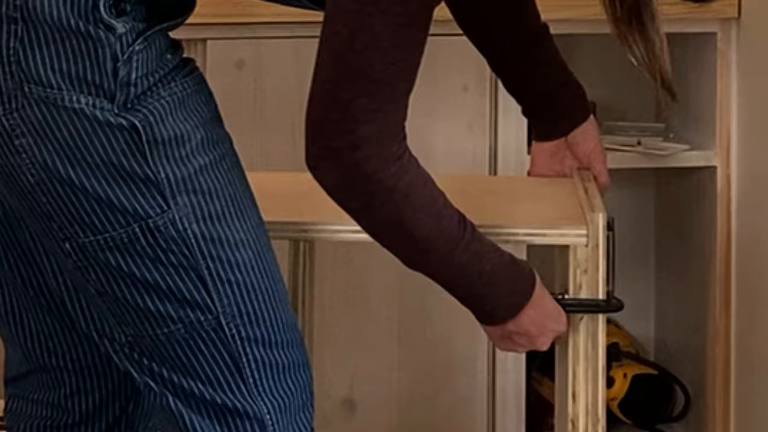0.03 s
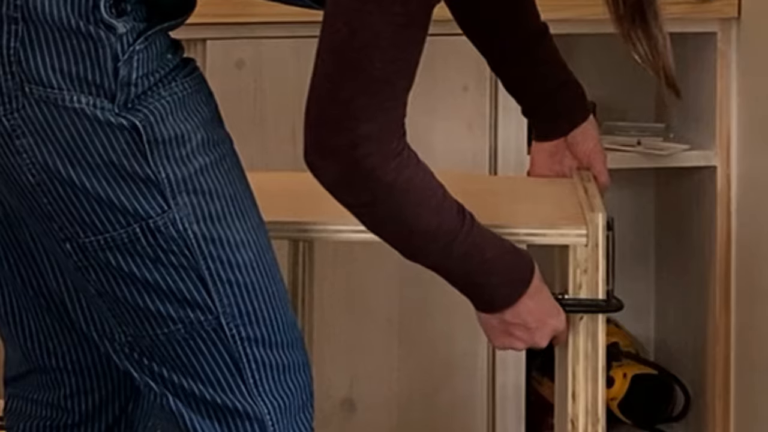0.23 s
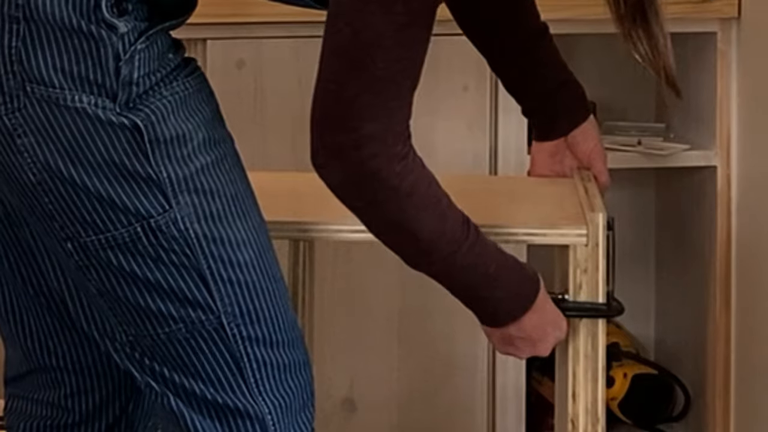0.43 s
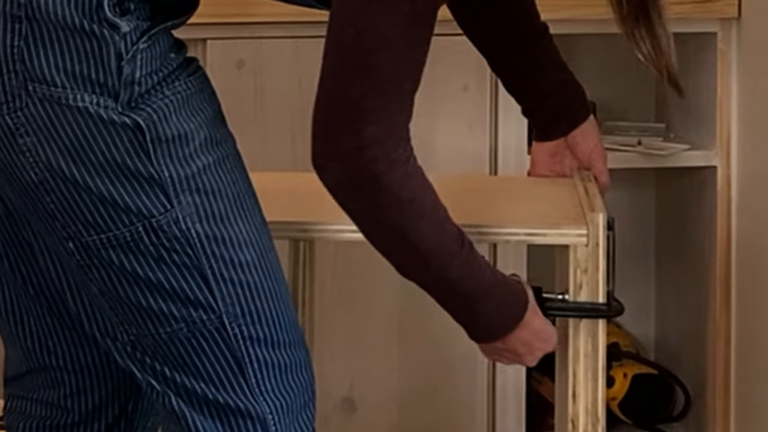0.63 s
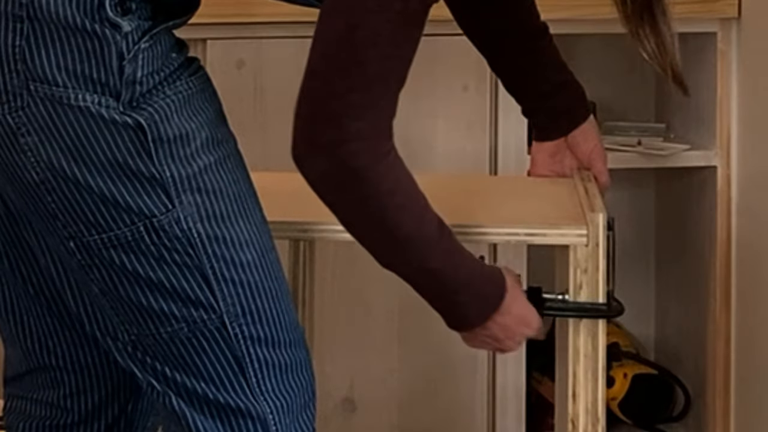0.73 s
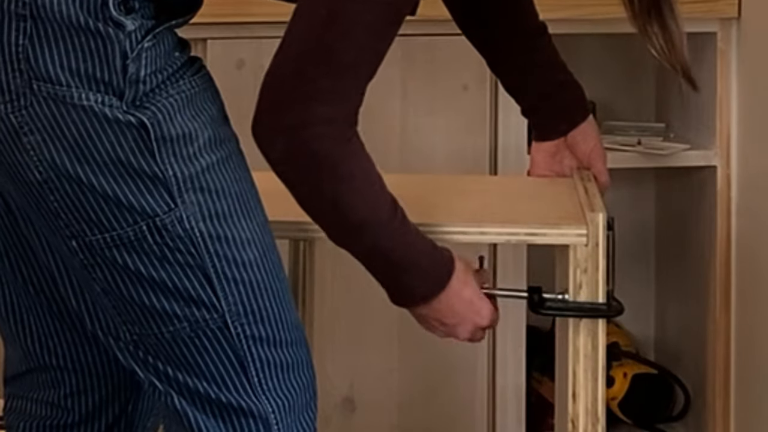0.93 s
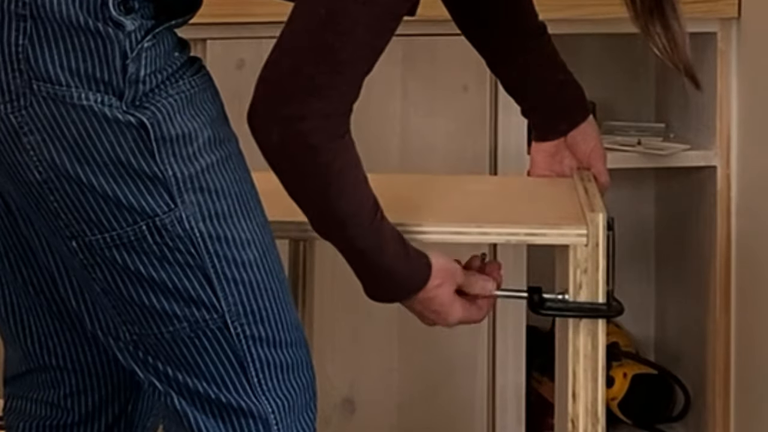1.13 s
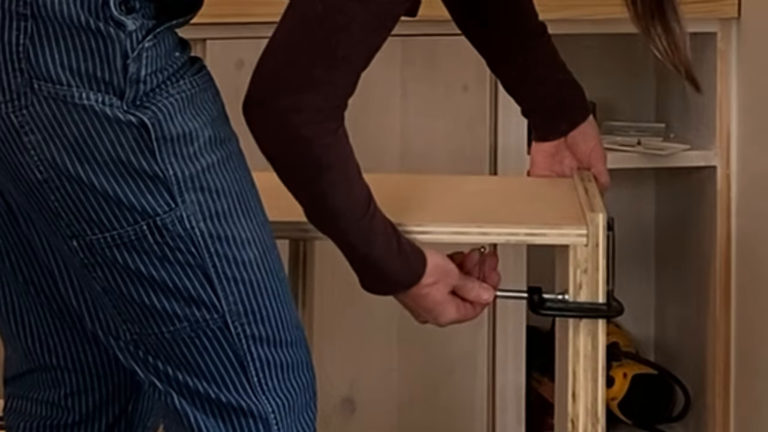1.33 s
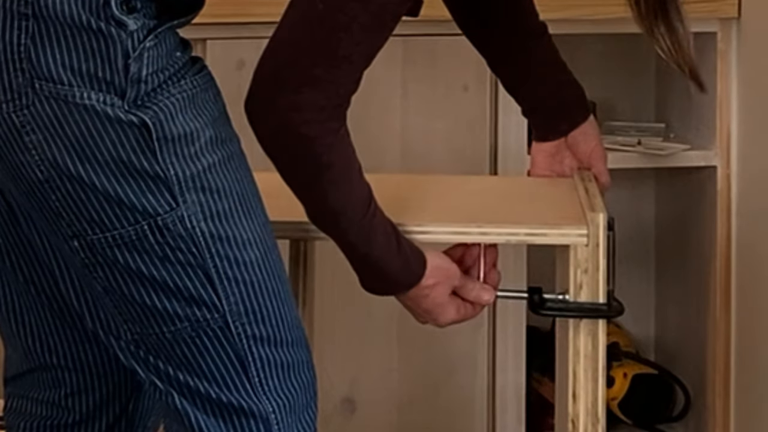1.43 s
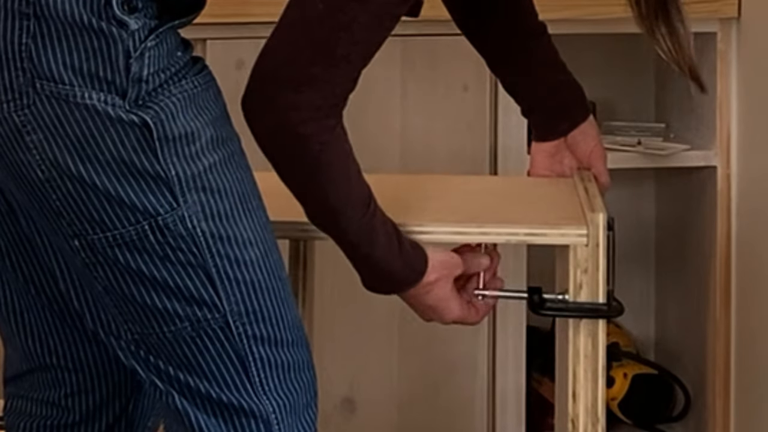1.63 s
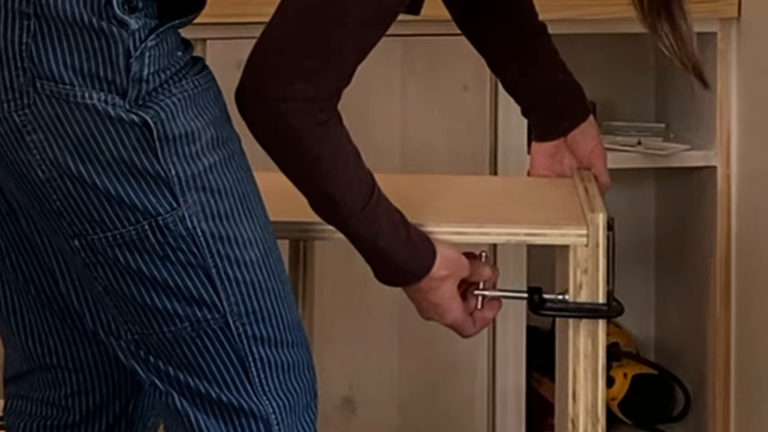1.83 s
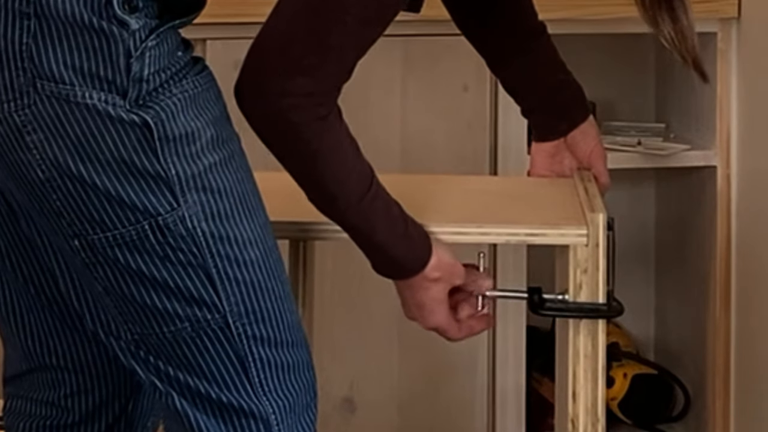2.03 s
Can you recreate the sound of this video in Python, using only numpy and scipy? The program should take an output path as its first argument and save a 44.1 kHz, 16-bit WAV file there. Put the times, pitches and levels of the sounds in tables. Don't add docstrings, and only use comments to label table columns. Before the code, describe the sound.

A small steel clamp is wound tight on a plywood board in a quiet workshop. Faint woody judders and light ticks come at 0 to 0.7 seconds; low air thumps buffet the close microphone around 0.9 to 1.3. A bright metallic clack rings at 1.12, with knocks following. Softer clicks at 1.6 and 1.7 lead to hollow knocks around 1.85 and a last tap at 2.06, over faint hiss.

```python
import sys
import numpy as np
from scipy import signal
from scipy.fft import rfft, irfft
from scipy.io import wavfile
from scipy.ndimage import uniform_filter1d

SR = 44100
rng = np.random.default_rng(int(sys.argv[2]) if len(sys.argv) > 2 else 0)


def file_out(sig):
    cols = np.atleast_2d(sig).T
    lim = np.clip(cols, -1, 1)
    pcm = np.round(lim * 32767).astype(np.int16)
    wavfile.write(sys.argv[1], SR, pcm)


def amplitude_ratio(level_db):
    exponent = np.asarray(level_db, float) / 20
    return 10 ** exponent


N = 91816


def evened(x):
    return x / np.sqrt(np.mean(x ** 2) + 1e-20)


def read(points, hz):
    f, value = np.transpose(points)
    return np.interp(np.log(hz + 1), np.log(f + 1), value)


def add(mix, start_s, sound):
    part = mix[max(round(start_s * SR), 0):][:len(sound)]
    part += sound[:len(part)]


def smoothed_twice(x, size):
    return uniform_filter1d(uniform_filter1d(x, size=size), size=size)


def coloured(size, spectrum):
    hz = np.fft.rfftfreq(size, 1 / SR)
    white = rfft(rng.standard_normal(size))
    return evened(irfft(white * amplitude_ratio(read(spectrum, hz)), size))


def floor():
    # f/Hz, level/dB per Hz
    room_hiss = [(25, -60),
                 (35, -41), (60, -12.5), (130, -10), (425, -20), (478, -19.5), (550, -23),
                     (1030, -28.5), (9910, -39.5), (15800, -41)]
    level_db, patch_db = -62, 0.2
    frames, hz = N // 256 + 5, np.fft.rfftfreq(1024, 1 / SR)
    a, b, patches = rng.standard_normal((frames, 513, 3)).T
    patches = uniform_filter1d(patches, size=14, axis=0)
    patches = evened(uniform_filter1d(patches, size=12, axis=1))
    spectrum_db = read(room_hiss, hz)[:, None]
    z = (a + 1j * b) * amplitude_ratio(spectrum_db + patch_db * patches)
    hiss = signal.istft(z, nperseg=1024, noverlap=768)[1][:N]
    return amplitude_ratio(level_db) * evened(hiss)


def air():
    # t/s, level/dB
    draught_course = [(0, -44.5), (.15, -48.5), (.28, -47), (.4, -39), (.48, -44), (.55, -44), (.7, -48.5),
                      (.84, -47), (1.3, -38), (1.4, -48.5), (1.58, -46), (1.63, -43.5), (1.8, -46),
                      (1.93, -46), (2.08, -42.5)]
    # f/Hz, level/dB per Hz
    draught_colour = [(3, -16), (15, 7), (36, 0.5), (50, -10.5), (90, -14.5), (130, -63.5), (400, -32),
                      (900, -140)]
    # t/s, level/dB, width/s, push or pull [+1/-1]
    buffets = [(0.371, -38, 0.0053, 1), (0.413, -39, 0.0034, -1), (0.481, -50, 0.0058, 1),
               (0.858, -34, 0.0043, 1), (0.873, -25.5, 0.0046, -1), (.882, -24, 0.0043, 1),
               (0.894, -23.5, 0.004, 1), (0.905, -24.5, 0.0082, -1), (0.927, -38, 0.0062, 1),
               (0.943, -26.5, 0.0021, 1), (0.974, -31.5, 0.0033, 1), (0.984, -21.5, 0.0044, -1),
               (1.013, -23.5, 0.014, -1), (1.028, -29, 0.0025, 1), (1.058, -19.5, 0.0022, -1),
               (1.07, -23.5, 0.0026, 1), (1.086, -29.5, 0.018, -1), (1.155, -28.5, 0.0026, 1),
               (1.177, -22.5, 0.005, -1), (1.191, -24.5, 0.002, 1), (1.224, -34.5, 0.0019, -1),
               (1.238, -33, 0.0025, 1), (1.258, -29, 0.00315, -1), (1.271, -39, 0.0077, 1),
               (1.31, -27.5, 0.0046, -1), (1.63, -35.5, 0.0069, -1), (1.675, -48, .006, 1)]
    t = np.arange(N) / SR
    course_s, course_db = np.transpose(draught_course)
    draught = coloured(N, draught_colour)
    draught = draught / np.sqrt(abs(smoothed_twice(draught ** 2, 1800)) + 0.012)
    lumps = np.zeros(N)
    for at_s, db, width_s, way in buffets:
        lumps += np.sign(way) * amplitude_ratio(db) * np.exp(-0.5 * ((t - at_s) / width_s) ** 2)
    lumps = lumps - smoothed_twice(lumps, 3000)
    return amplitude_ratio(np.interp(t, course_s, course_db)) * draught + lumps


def workshop(x):
    # f/Hz, t60/s
    decay = [(250, 0.17), (500, 0.42), (1000, 0.32), (4000, 0.17), (8000, 0.24), (14000, 0.25)]
    level_db, delay_s, low_hz = -6.5, 0.006, 900
    taps, at = np.zeros(SR // 2), np.arange(0, SR // 2 - 20, 20)
    taps[at + rng.integers(0, 20, len(at))] = rng.choice([-1., 1.], len(at))
    hz, t, z = signal.stft(taps, SR, nperseg=256)
    fade = amplitude_ratio(-60 * t / read(decay, hz)[:, None])
    bass_cut = np.minimum(hz / low_hz, 1)[:, None]
    tail = signal.istft(z * fade * bass_cut, SR, nperseg=256)[1]
    wet = np.zeros(N)
    add(wet, delay_s, signal.fftconvolve(x, tail / np.linalg.norm(tail)))
    return amplitude_ratio(level_db) * wet


def swell(length_s):
    peak_at = 0.71
    u = np.arange(SR // 8) / SR / length_s
    return np.clip(np.minimum(0.49 + u / peak_at, (1 - u) / (1 - peak_at)), 0, 1)


def contacts(length_s):
    contacts_per_s, spread_db = 7000, 3
    chance, size, sign = rng.random((SR // 8, 3)).T
    hits = (chance < contacts_per_s / SR) * np.sign(sign - 0.5)
    force = swell(length_s) * hits * amplitude_ratio(-spread_db * np.log(size + 0.02))
    return force / np.linalg.norm(force) * np.sqrt(length_s * SR)


def ring(modes, grain, grain_db):
    spot_db = 2
    t = np.arange(SR // 5) / SR
    spot = spot_db * rng.standard_normal(len(modes))
    clear = np.zeros(len(t))
    for (hz, db, t60_s), shift_db in zip(modes, spot):
        clear += amplitude_ratio(db + shift_db - 60 * t / t60_s) * np.sin(2 * np.pi * hz * t)
    hz = abs(np.fft.fftfreq(len(t), 1 / SR))
    log_gain = np.log(amplitude_ratio(np.maximum(read(grain, hz), -80)))
    click = np.fft.ifft(np.exp(np.conj(signal.hilbert(log_gain)))).real
    click = click * amplitude_ratio(-900 * t)
    return clear / np.linalg.norm(clear) + amplitude_ratio(grain_db) * click / np.linalg.norm(click)


def drum(start_s, length_s, hz, t60_s):
    detune = 0.006
    t = np.arange(SR // 4) / SR
    stored = signal.fftconvolve(swell(length_s), amplitude_ratio(-60 * t / t60_s))[:len(t)]
    wobble = evened(uniform_filter1d(rng.standard_normal(len(t)), size=300))
    turns = hz * (start_s + t * (1 + detune * rng.standard_normal()))
    level = stored / stored.max() * amplitude_ratio(2.2 * wobble)
    return level * np.sin(2 * np.pi * turns + 0.29 * wobble)


def judder(start_s, length_s, panel_db, shelf_db, board_db):
    # f/Hz, level/dB, t60/s
    board_modes = [(663, -3, 0.12), (744, -3, 0.066), (844, 9, 0.019), (1110, 4, 0.015), (1233, 3, 0.022),
                   (1304, -5, 0.041), (1370, -3, 0.028), (1392, 0, 0.017), (1870, -1.5, 0.049),
                   (2160, -9.5, 0.04), (1540, -0.5, 0.014)]
    # f/Hz, level/dB per Hz
    board_grain = [(230, -43.5), (300, 20.5), (600, 1.5), (1400, -7.5), (2300, 6.5), (3000, -56),
                   (6000, -48)]
    board = ring(board_modes, board_grain, grain_db=-5.5)
    out = amplitude_ratio(board_db) * signal.fftconvolve(contacts(length_s), board)
    panel = amplitude_ratio(panel_db) * drum(start_s, length_s, hz=335, t60_s=0.03)
    shelf = amplitude_ratio(shelf_db) * drum(start_s, length_s, hz=482, t60_s=0.019)
    add(out, 0, panel + shelf)
    return start_s, out


def rattle(start_s, length_s, frame_db, pin_db, top_hz):
    # f/Hz, level/dB, t60/s
    frame_modes = [(1563, 21, 0.041), (1920, -37, 0.031), (2050, 28, 0.018), (2470, -20, 0.061),
                   (2820, -29, 0.075), (2860, -6, 0.15), (3820, -40, 0.014), (4460, 10, 0.06),
                   (6100, 18, 0.015), (6360, -5, 0.077), (6470, -8, 0.01), (6860, -52, .03)]
    # f/Hz, level/dB per Hz
    frame_grain = [(530, -48), (900, -18), (1560, -5), (2860, 0), (3900, -10), (6200, -10), (11400, -20),
                   (15500, -34)]
    # f/Hz, level/dB, t60/s
    pin_modes = [(3490, 2, 0.027), (6730, -1, .015), (8600, 2, 0.03), (9150, 5.5, 0.021), (11400, 8, 0.027)]
    # f/Hz, level/dB per Hz
    pin_grain = [(1500, -76), (2500, -5.5), (5500, -12), (8500, -7), (12000, -13), (15500, -40)]
    frame = amplitude_ratio(frame_db) * ring(frame_modes, frame_grain, grain_db=5)
    pin = amplitude_ratio(pin_db) * ring(pin_modes, pin_grain, grain_db=-1)
    soft = signal.lfilter(*signal.butter(3, top_hz, fs=SR), contacts(length_s))
    return start_s, signal.fftconvolve(soft, frame + pin)


def tick(start_s, db, hz, width_hz):
    t = np.arange(SR // 10) / SR
    decay = np.exp(-np.pi * width_hz * t)
    onset = 1 - np.exp(-t * width_hz * 6)
    return start_s, amplitude_ratio(db) * decay * np.sin(2 * np.pi * hz * t) * onset


def scene():
    # t/s, length/s, side panel level/dB, shelf level/dB, upper board modes level/dB
    judders = [(.0, 0.023, -61.5, -66, -66), (0.357, 0.02, -58.5, -57, -70.5),
               (0.407, 0.041, -63, -70, -68.5), (0.461, 0.014, -63, -57, -62.5),
               (0.578, 0.019, -60, -55.5, -72.5), (0.941, 0.073, -86, -87, -67),
               (1.063, 0.051, -58, -61.5, -68.5), (1.122, 0.025, -56, -47.5, -50.5),
               (1.176, 0.015, -49.5, -37.5, -48), (1.2, 0.023, -76, -49.5, -55.5),
               (1.226, 0.03, -58, -56, -56), (1.383, 0.01, -64, -54, -59.5),
               (1.444, 0.087, -66, -66, -74.5), (1.618, 0.026, -45, -47.5, -54.5),
               (1.657, 0.03, -65, -52, -61.5), (1.71, 0.038, -62.5, -64, -59.5),
               (1.735, 0.028, -57, -53, -54), (1.828, 0.024, -45, -43, -47.5),
               (1.842, 0.035, -35, -39, -46.5), (1.871, 0.061, -68, -59, -55),
               (1.954, 0.018, -58, -51, -64.5), (2.058, 0.019, -52, -40, -59)]
    # t/s, length/s, frame level/dB, pin level/dB, contact top f/Hz
    steel_rattles = [(.0, 0.012, -66, -99, 5040), (.405, 0.048, -68, -97, 3200),
                     (0.448, 0.031, -70, -106, 5930), (0.943, 0.065, -73, -75.5, 9200),
                     (1.122, 0.018, -47, -57, 15600), (1.137, 0.029, -50, -64, 7040),
                     (1.178, 0.013, -52.5, -70, 7500), (1.196, 0.05, -67.5, -94, 6600),
                     (1.304, 0.0037, -70, -68.5, 12000), (1.388, 0.022, -76.5, -85, 6030),
                     (1.613, 0.023, -67, -69, 12400), (1.709, 0.01, -63.5, -58.5, 11000),
                     (1.712, 0.04, -63, -69, 4800), (1.828, 0.035, -69.5, -61.5, 12900),
                     (1.855, 0.02, -68, -60.5, 9200), (2.057, 0.017, -69, -68, 14900)]
    # t/s, level/dB, f/Hz, width/Hz
    single_modes = [(.407, -46, 2900, 300), (.404, -48, 3600, 350), (.404, -48, 4500, 350),
                    (0.406, -42.5, 10500, 1490), (.457, -38.5, 4820, 280), (0.462, -47, 5470, 400),
                    (.482, -52, 4900, 300), (0.461, -50, 1230, 70.4), (.709, -40, 12200, 2500),
                    (.712, -56, 1220, 90.5), (.845, -64, 1590, 60), (.919, -44.5, 10500, 1800),
                    (1.122, -31, 8800, 600), (1.1225, -34, 11300, 500), (1.13, -27, 6060, 400),
                    (1.131, -26.5, 8950, 700), (1.131, -27, 11200, 500), (1.146, -37, 2900, 300),
                    (1.179, -37, 6030, 200), (1.181, -37, 4930, 300), (1.181, -35.5, 1543, 69.6),
                    (1.181, -32, 641, 45.6), (1.199, -39, 995, 50), (1.228, -39, 873, 40.2),
                    (1.255, -46, 936, 50), (1.298, -48, 773, 50), (1.304, -51, 1040, 80),
                    (1.385, -51.5, 5370, 300), (1.620, -43, 1625, 91.7), (1.620, -47, 4850, 250),
                    (1.708, -43.5, 2160, 90), (1.707, -49.5, 3440, 60), (1.712, -46, 7700, 200),
                    (1.71, -41, 11400, 110), (1.740, -42.5, 1826, 50), (1.768, -47, 1370, 50),
                    (1.827, -50, 11400, 43.7), (1.830, -37.5, 2150, 200), (1.8565, -32.5, 8700, 600),
                    (1.858, -35.5, 6400, 600), (1.860, -48, 3500, 30.2), (1.863, -35, 6850, 600),
                    (1.864, -36.5, 9200, 600), (1.878, -53, 7040, 400), (1.895, -54, 2164, 40.6),
                    (2.057, -47, 1610, 92), (2.060, -50, 11550, 150), (2.058, -41.5, 206.5, 29.9),
                    (2.064, -51, 2160, 49.5),
                    (1.124, -43, 1567, 22), (1.124, -39, 2900, 36), (1.126, -44, 5950, 69), (1.135, -47, 4880, 55),
             (1, -53, 970, 25), (1.838, -40, 1110, 12.6), (1.836, -37.5, 1375, 10), (1.6, -51, 1870, 10),
             (1.845, -44, 861, 14), (1.862, -36, 338.6, 11), (1.90, -52, 1375, 15), (2.060, -47, 750, 21)]
    clamp = np.zeros(N)
    for row in judders:
        add(clamp, *judder(*row))
    for row in steel_rattles:
        add(clamp, *rattle(*row))
    for row in single_modes:
        add(clamp, *tick(*row))
    return (clamp + workshop(clamp) + air() + floor())[None]


def roll_off(x):
    return signal.sosfilt(signal.butter(12, 16110, fs=SR, output="sos"), x)


def record(dry):
    lowpass = signal.firwin(511, 15800, window=("kaiser", 9), fs=SR)
    cut = signal.oaconvolve(dry, lowpass[None], "same")
    return roll_off(cut)


dry = scene()
out = record(dry)
file_out(out)
```